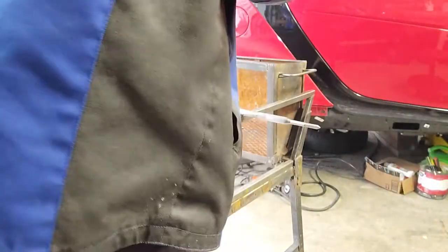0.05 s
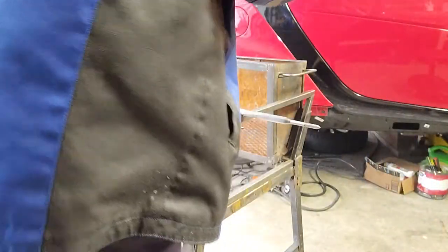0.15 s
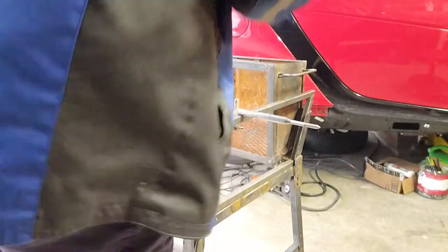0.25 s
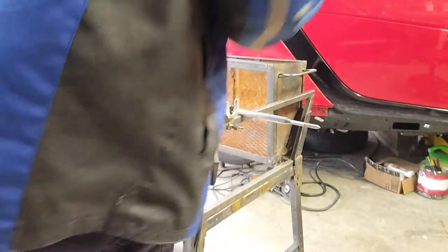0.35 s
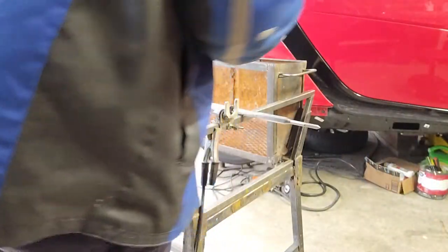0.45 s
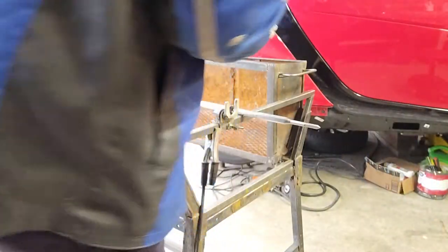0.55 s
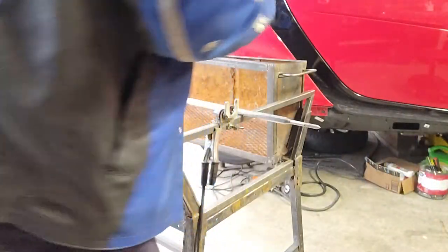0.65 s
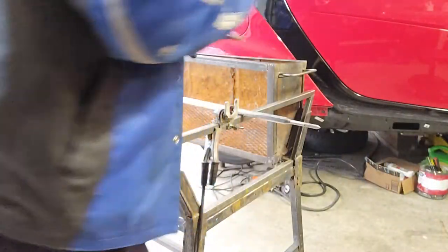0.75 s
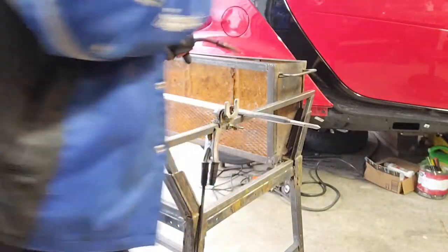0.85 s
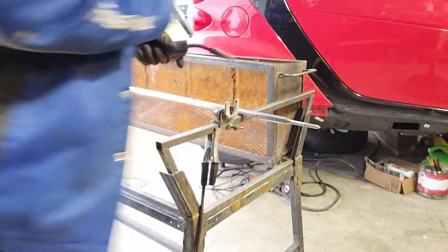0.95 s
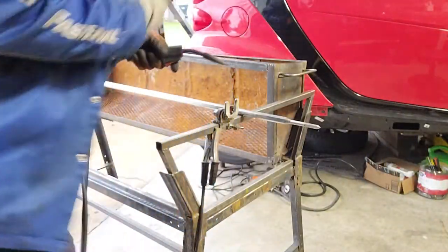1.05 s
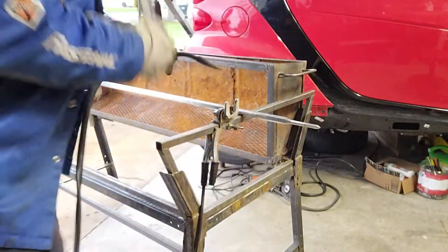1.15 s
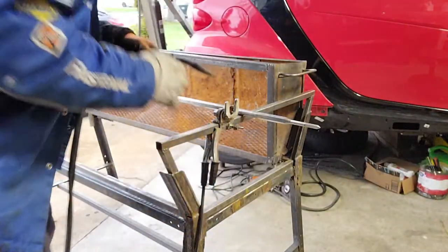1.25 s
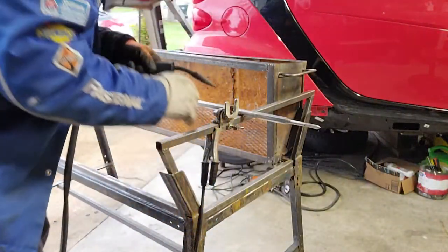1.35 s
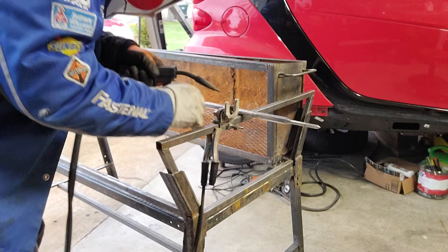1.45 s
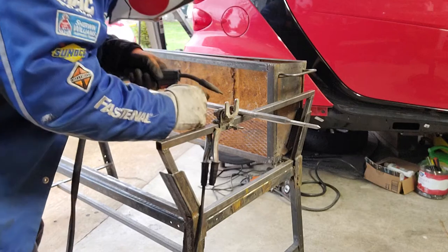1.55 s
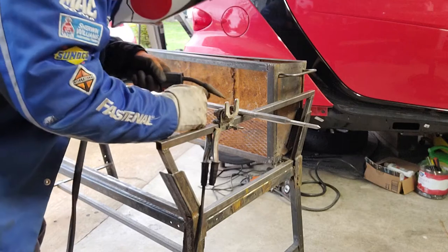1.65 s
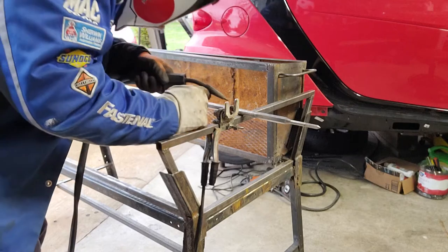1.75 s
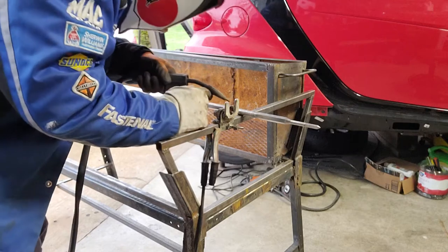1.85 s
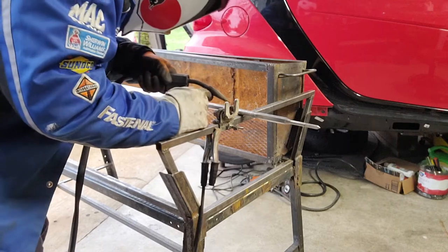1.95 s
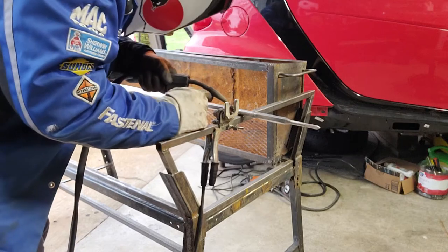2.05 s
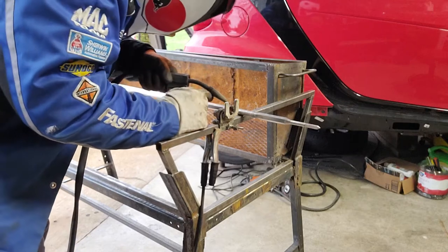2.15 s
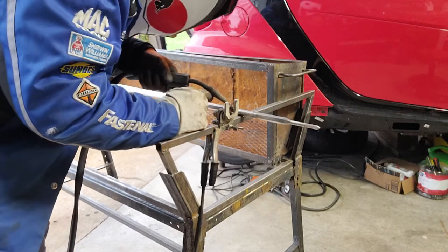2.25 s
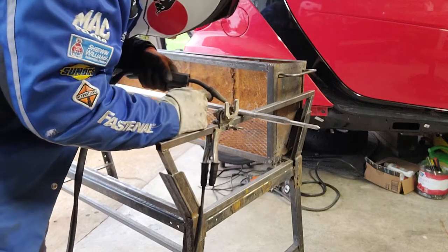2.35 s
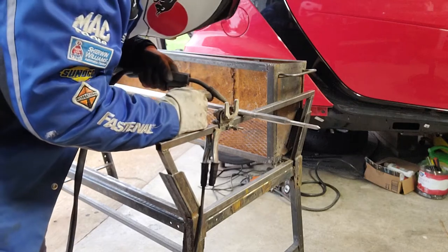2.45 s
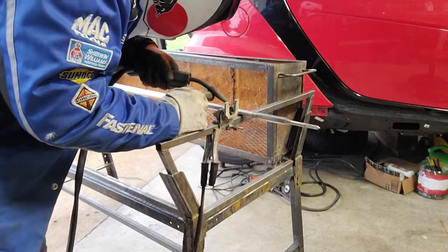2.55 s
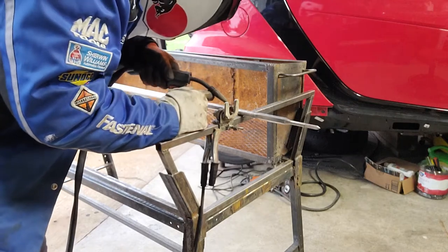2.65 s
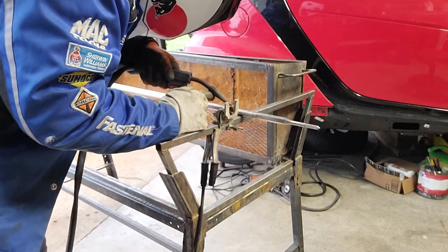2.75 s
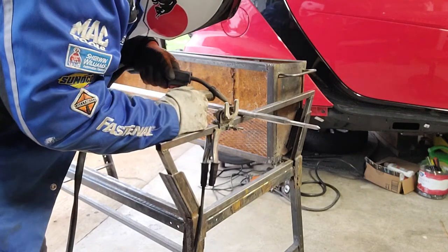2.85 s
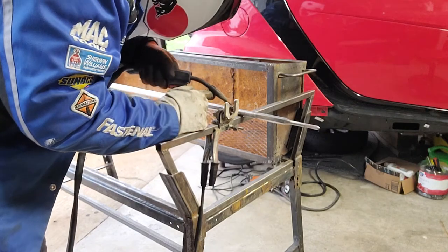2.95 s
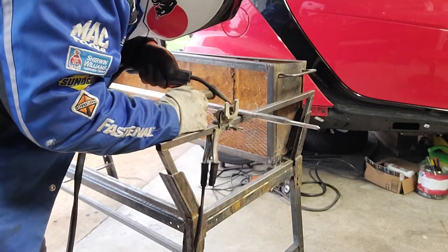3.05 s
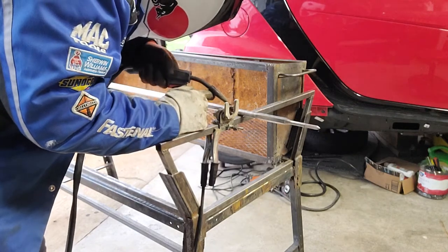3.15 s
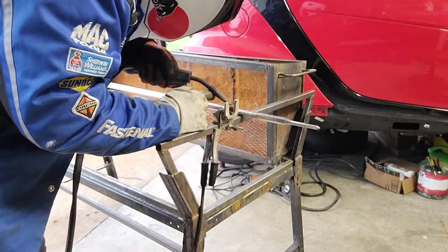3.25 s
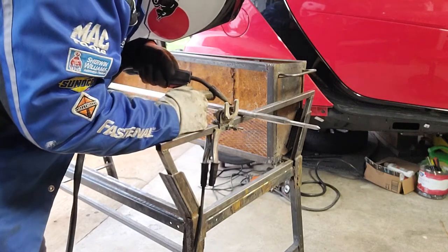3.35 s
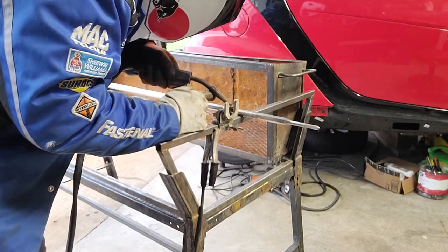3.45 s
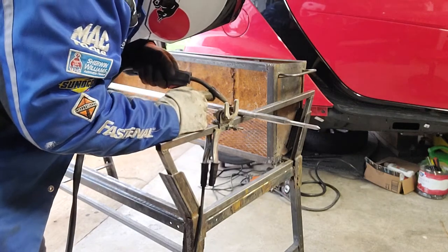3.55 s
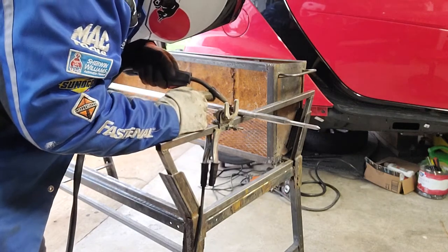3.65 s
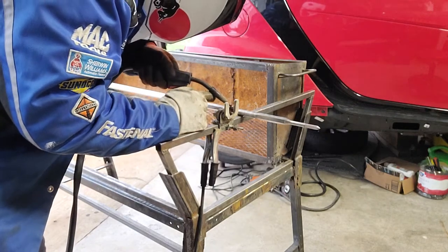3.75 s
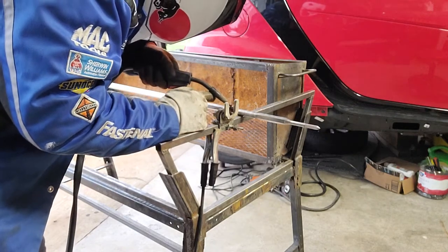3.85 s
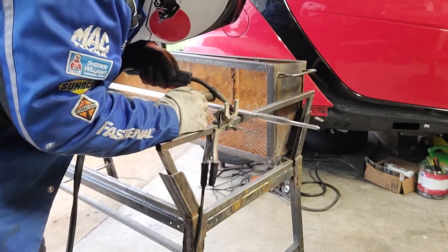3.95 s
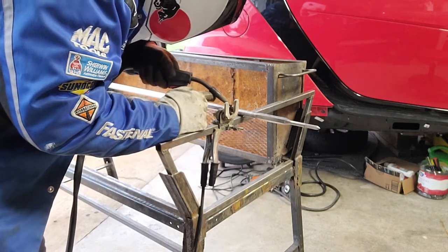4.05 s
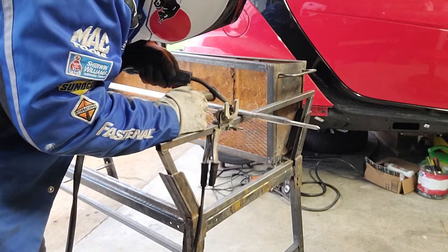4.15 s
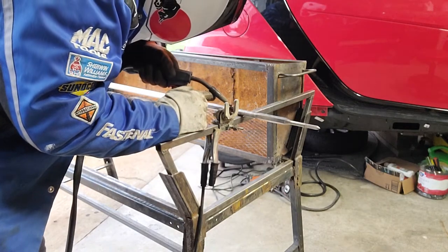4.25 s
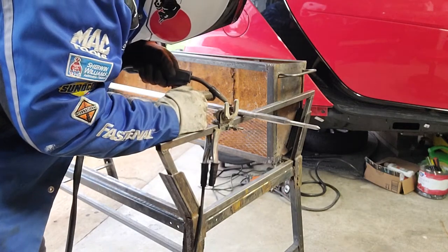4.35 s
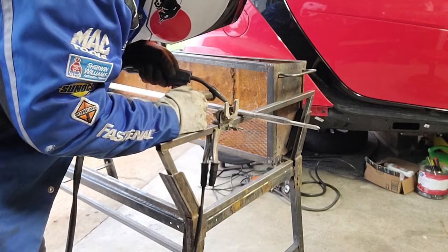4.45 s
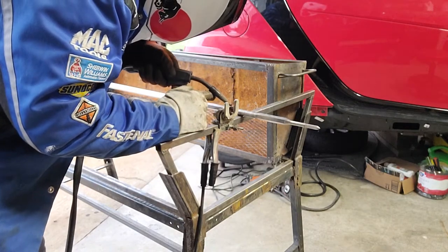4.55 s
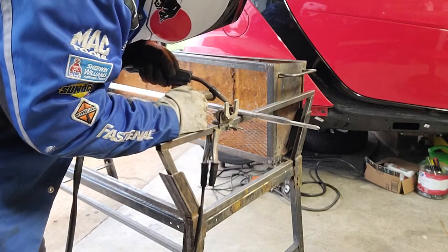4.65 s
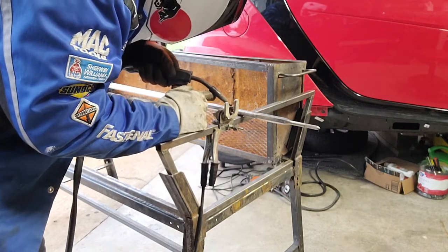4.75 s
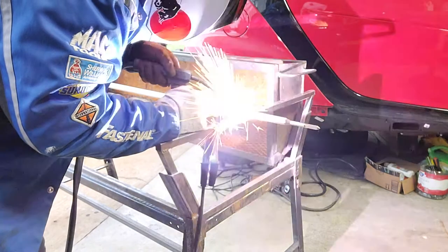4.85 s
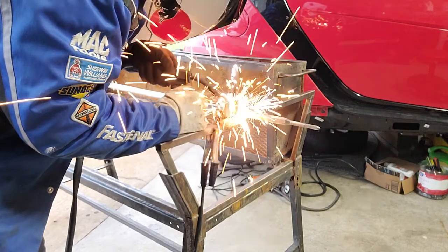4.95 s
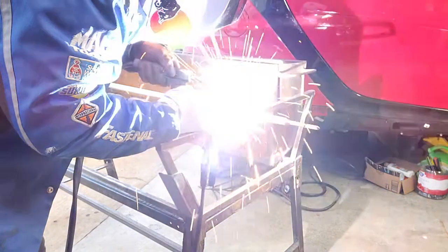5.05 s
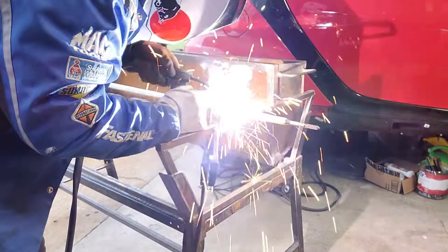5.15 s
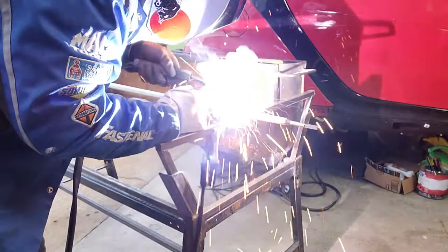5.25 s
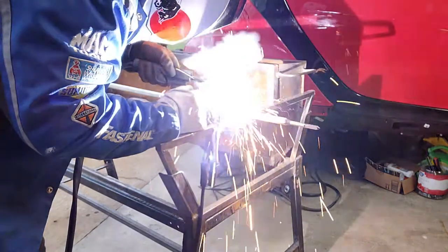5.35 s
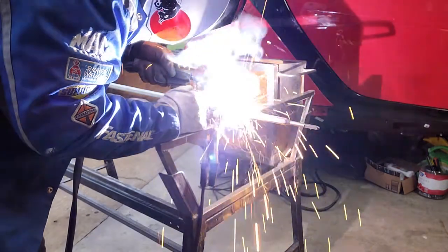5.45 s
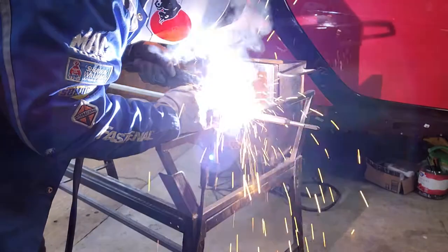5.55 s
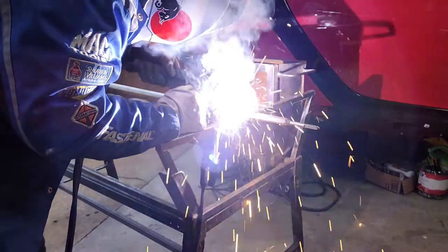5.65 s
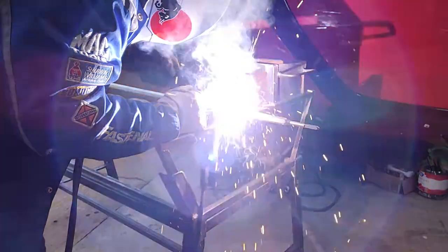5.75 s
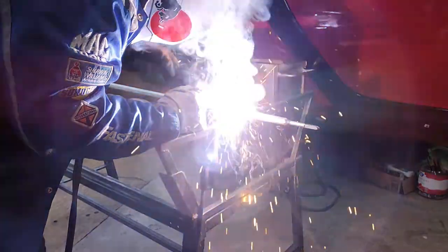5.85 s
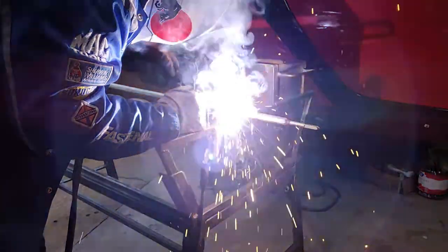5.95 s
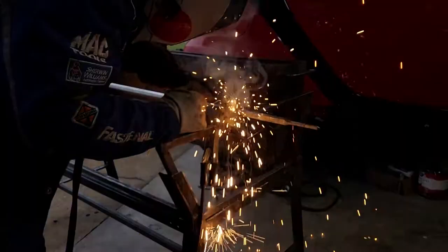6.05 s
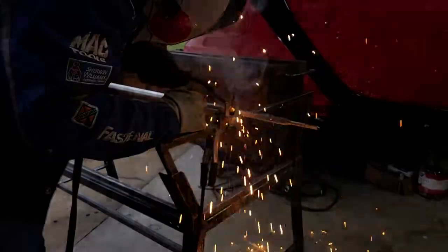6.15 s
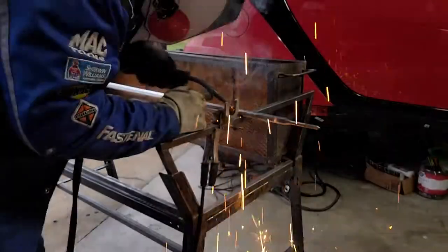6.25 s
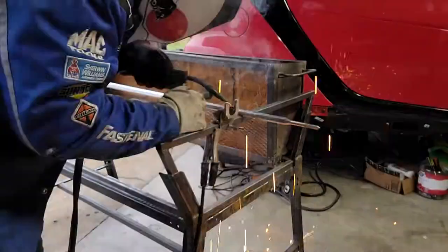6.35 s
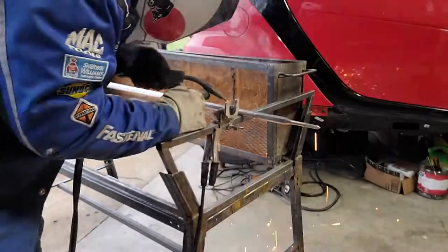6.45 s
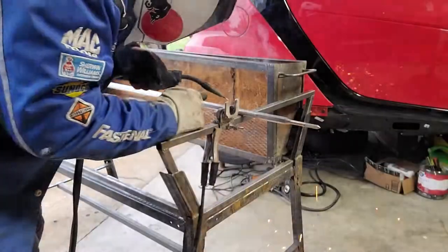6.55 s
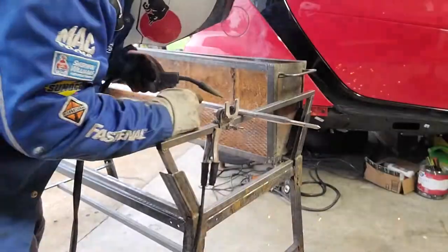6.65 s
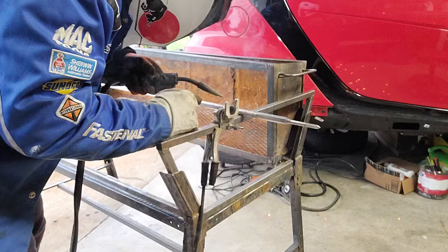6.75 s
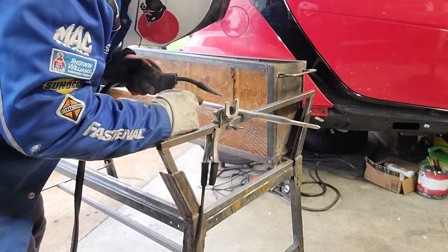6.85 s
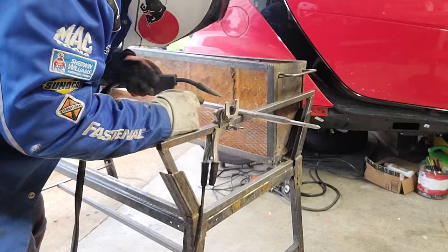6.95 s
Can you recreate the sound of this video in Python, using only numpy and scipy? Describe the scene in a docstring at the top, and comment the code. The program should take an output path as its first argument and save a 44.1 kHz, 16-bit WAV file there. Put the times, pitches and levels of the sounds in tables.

```python
"""A welding arc strikes, stutters and crackles for about a second, then dies in the room: gated noise spits and thuds.
Before and after it, damped modes ring for knocks and torch bumps; coloured grains make scuffs, squeaks and rustles.
A thin gas hiss is filtered noise. A cooling fan to the right gives shaft and blade tones over rushing air, and deep
noise rumbles and swells with each thump. The phone's two microphones turn down under the arc and recover slowly."""
import sys
import numpy as np
from scipy import signal
from scipy.fft import rfft, irfft, next_fast_len
from scipy.io import wavfile
from scipy.ndimage import uniform_filter1d

SR = 44100
rng = np.random.default_rng(int(sys.argv[2]) if len(sys.argv) > 2 else 0)


def transcribe(u):
    """Save the signal u as a 16-bit wav file named by the first command-line argument.

    u: samples, shape (n,) or (channels, n), limited to [-1, 1]; the rate is SR.
    q: integer samples, one column per channel.
    """
    v = np.clip(np.atleast_2d(u).T, -1, 1)
    q = np.round(v * 32767).astype(np.int16)
    wavfile.write(sys.argv[1], SR, q)


def invert_db(level):
    """Linear amplitude ratio for a level in decibels (20 dB per decade), elementwise."""
    return 10 ** (np.asarray(level, dtype=float) / 20)


N = 308259

# colour of the floor rumble: (frequency [Hz], response [dB])
RUMBLE_COLOUR = [(15, -50), (28, -16), (42, -3.0), (70, 1.0), (130, -4.0), (250, -16.5), (600, -46.5)]
# heavy steps and thumps through the floor: (time [s], level [dB], decay by 60 dB [s])
FLOOR_THUMPS = [(0, -33.5, 0.17), (0.2, -37.5, 0.62), (1.15, -53, .6), (4.3, -47, 0.41), (4.68, -44, 1),
                (4.8, -49, 0.94), (5.06, -33.5, 0.31), (6.925, -35, 0.86)]

# fan shaft speed, a shade faster by the end of the weld: (time [s], turns per second [Hz])
SHAFT_SPEED = [(0, 74.08), (4.7, 74.08), (6.1, 74.22)]
# multiples of the shaft turn that sound, for seven blades: [times the shaft speed]
TONE_MULTIPLES = [1, 2, 3, 4, 7, 8, 10, 14, 16, 19, 20, 21, 24, 28, 35, 42, 44, 49, 56, 63]
# one row for each multiple: (level [dB], left minus right [dB], lag of the left [rad],
# change while the worker stands in front [dB])
TONE_LEVELS = [(-67, 0, -0.5, 2), (-64, 0, 0, -7), (-60, 1, 0.63, 0), (-54, -2, 0.7, -2), (-64, -6, 2.2, 6),
               (-64.5, -4, 0.9, -9), (-65.5, -7, 1.6, 2), (-50.2, -1.2, 2.68, 0.8), (-62, 1, 3.5, -1),
               (-65, -2, -3.5, 1.5), (-60.5, -3, -3, 5), (-55.5, 1, -.5, -0.5), (-54, 4.5, 0.1, 0.5),
               (-59, 4.5, 0.33, -1), (-62, 6, 3.5, 2), (-72.5, -10, -2.5, 2), (-74, -1, 0, 1.5),
               (-69, -6, -1.8, 4), (-75, -1, 2.6, -1.5), (-74, -1, 2, 0)]
# how far the worker stands in front of the phone: (time [s], share [1 = in front])
WORKER_IN_FRONT = [(0, 0.65), (.65, 1.3), (.95, 0.02)]
# colour of the fan air: (frequency [Hz], response [dB])
AIR_COLOUR = [(53, -48), (90, -23), (180, -20), (303, -1.5), (450, -3), (535, -8.5), (600, -3), (670, -12),
              (750, -5), (820, -7), (1020, -4), (1120, -15.5), (1350, -10.5), (1790, -17.5), (1890, -20),
              (1980, -20), (2060, -21), (2400, -21), (2950, -24), (3590, -22), (9110, -34), (11100, -32.5),
              (16000, -33)]
# air noise that both microphones share: (frequency [Hz], share of the power [0-1])
AIR_SHARED = [(100, 0.92), (350, 0.98), (780, 0.59), (1500, 1), (2600, 0.39), (5000, 0.23), (12000, .05)]
# stereo tilt of the fan air: (frequency [Hz], left minus right [dB])
AIR_TILT = [(100, -1.5), (700, -2), (2400, -5), (6000, 4.5), (9000, -4), (11500, -13.5), (15000, -7)]

# shielding gas: (time [s], level [dB])
GAS_LEVEL = [(4.66, -87), (4.7, -76), (6.1, -58), (6.65, -62.5), (7, -60)]
# colour of the nozzle hiss: (frequency [Hz], response [dB])
GAS_COLOUR = [(2000, -28.5), (6000, -8), (9500, -19), (11500, -6), (16000, -3)]

# a shoe scuffs the floor: (start [s], loudest [s], end [s], level [dB])
SHOE_SCUFFS = [(1.107, 1.155, 1.215, -34.5)]
# colour of sole on floor: (frequency [Hz], response [dB])
SOLE_COLOUR = [(300, -30), (700, -13), (1200, -8), (2000, -11.5), (3080, -7.5), (4000, -14), (5100, -10.5),
               (6200, -17.5), (7690, -16.5), (8790, -25.5), (16000, -15.5)]
# the rubber squeaks during the scuff: (start [s], loudest [s], end [s], level [dB])
RUBBER_SQUEAKS = [(1.122, 1.138, 1.165, -33.5)]
# colour of the rubber: (frequency [Hz], response [dB])
RUBBER_COLOUR = [(900, -35), (1400, -8), (1556, -1.5), (1680, -13), (1880, -1), (2010, -1), (2180, 0),
                 (2350, -18), (2640, -11), (4000, -34)]
# the torch drags on the steel: (start [s], loudest [s], end [s], level [dB])
TORCH_DRAGS = [(.826, .855, 0.907, -39.5), (1.017, 1.022, 1.04, -42)]
# colour of the steel: (frequency [Hz], response [dB])
STEEL_COLOUR = [(180, -37), (400, -3), (645, -4), (1170, -7.5), (1480, -13), (2900, -11), (3800, -22),
                (8220, -33), (16000, -40)]
# cloth rustles: (start [s], loudest [s], end [s], level [dB]); the last row's end lies before its start, so it
# makes no rustle but a faint steady cloth bed that drops at 6.28 s
CLOTH_RUSTLES = [(.12, .2, 0.32, -58.5), (.825, .83, 0.94, -54), (.955, .97, 1.2, -53.5),
                 (6.657, 6.665, 6.28, -45)]
# colour of the cloth: (frequency [Hz], response [dB])
CLOTH_COLOUR = [(1000, -24), (4000, -2.5), (8500, -18.5), (11000, -5), (16000, -8.5)]
# the wire touches down and scrapes: (start [s], loudest [s], end [s], level [dB])
WIRE_TOUCH = [(4.8, 4.835, 4.86, -43)]
# colour of the wire: (frequency [Hz], response [dB])
WIRE_COLOUR = [(500, -37), (1300, 1), (2000, -2), (3000, -12), (5000, -24.5)]

# knocks of trigger, cable and feet: (time [s], relative level [dB], pitch [Hz],
# decay by 60 dB at the pitch [s], tick level [dB])
KNOCK_EVENTS = [(0.212, -30, 199, 0.096, -60), (.23, -28, 227, 0.045, -72), (0.31, -32, 89, 0.04, -72),
                (0.384, -40, 81.6, 0.062, -70), (.745, -39, 150, 0.08, -70), (1.1071, -32, 560, 0.024, -42),
                (2.049, -39, 245, 0.068, -70), (4.673, -36, 140, 0.15, -58), (4.798, -41, 320, 0.2, -51),
                (5.424, -42, 62, 0.14, -70), (5.885, -41, 65, .15, -72), (5.996, -37, 78.6, 0.21, -70),
                (6.657, -61, 2040, .02, -43), (6.909, -36, 308, 0.11, -70), (6.926, -32.5, 61.5, 0.5, -68)]
# modes of a knock: (frequency [times the pitch], level for a 550 Hz pitch [dB])
KNOCK_RATIOS = [(1.015, 3), (0.6, -9), (1.4, -2.5), (2.8, -3.5), (3.7, -5)]

# the torch bumps and chatters on the bench: (time [s], relative level [dB],
# frequency that the contact stirs most [Hz], tick level [dB])
BUMPS = [(.827, -32, 2200, -38), (.831, -35, 700, -48), (0.837, -31, 1100, -50), (.843, -34, 500, -55),
         (.851, -20, 560, -48), (.8555, -34, 450, -52), (0.8586, -27.5, 900, -50), (0.863, -32, 1500, -48),
         (.87, -35, 900, -50), (.879, -36, 420, -60), (.886, -39, 450, -60), (1.018, -29, 1300, -44),
         (1.02, -26, 620, -60), (1.027, -33, 476, -54), (1.0355, -26.5, 420, -56)]
# ringing of the torch body: (frequency [Hz], level [dB], decay by 60 dB [s])
TORCH_RINGING = [(310, -1.5, .04), (458, 0.5, 0.031), (650, 0, 0.031), (780, 1, 0.023), (1100, -7.5, 0.023),
                 (1440, -5.5, 0.03), (2280, -4.5, .035), (2960, -7.5, .035), (3580, -11, .03)]

# each time the arc relights: (strike [s], length [s], sizzle level [dB], sag before it goes out [dB])
ARC_BURNS = [(4.852, 0.019, -19, 3), (4.881, 0.02, -24, 6), (4.903, 0.015, -15.5, 1.5),
             (4.924, 0.045, -19.5, 21), (4.97, 0.015, -29, 0), (4.99, 0.051, -43, 6),
             (5.031, 0.017, -32, -3), (5.049, 0.017, -21.5, -7), (5.072, 0.079, -20, 7.5),
             (5.135, 0.068, -19, 15), (5.201, 0.056, -22.5, 4), (5.264, 0.11, -25, 4),
             (5.365, 0.052, -25.5, 4), (5.42, 0.022, -28, 5), (5.443, 0.076, -27, -6.5),
             (5.518, 0.027, -20.5, 8), (5.55, 0.0055, -31, 5), (5.562, 0.01, -24, 9),
             (5.586, 0.03, -26.5, -6), (5.622, 0.036, -23.5, 4), (5.661, 0.021, -26, 3),
             (5.693, 0.071, -28, -8), (5.78, 0.053, -27, -3), (5.834, 0.015, -24.5, -3.5),
             (5.848, 0.08, -21, -0.5), (5.927, 0.069, -22.5, -2.5), (6.011, 0.023, -21.5, 5)]
# short circuits that burst: (time [s], relative thud level [dB], relative snap level [dB])
SHORT_BURSTS = [(4.8519, -8.5, -7.5), (4.8534, -25, 1), (4.877, -18, 2), (4.8887, -24, 0), (4.9, -22, 8),
                (4.9115, -11, -9), (4.919, -19, -1), (4.9691, -9, 3), (5.012, -24, -23), (5.019, -22, -24),
                (5.0294, -11, -4), (5.0468, -28, 5), (5.0506, -29, 3.5), (5.0659, -29, 5.5),
                (5.108, -21, 0), (5.1397, -8, -10), (5.1617, -8.5, -6), (5.165, -21, -5), (5.2013, -11, 0),
                (5.209, -21, -0.5), (5.223, -28, 1), (5.228, -28, 4.5), (5.24, -30, 2.5), (5.2643, -20, -1),
                (5.268, -33, 5), (5.285, -34, 1), (5.2872, -25, -2), (5.2939, -28, -1), (5.3001, -29, 6),
                (5.326, -27, 3), (5.3445, -24, 2), (5.3515, -15, 2), (5.3632, -26, -10),
                (5.3687, -5.5, 6.5), (5.373, -22, 3), (5.3749, -9.5, -2), (5.3885, -20, 6),
                (5.395, -31, -8), (5.4004, -22, 1), (5.42, -27, 5), (5.4244, -14, 3), (5.444, -33, 5.5),
                (5.4524, -30, 7), (5.469, -32, 7), (5.484, -19, 4), (5.495, -25, 4.5), (5.5108, -32, 4.5),
                (5.554, -33, 3), (5.5623, -28, 6), (5.587, -33, 5.5), (5.6095, -30, 3.5), (5.6228, -29, 5),
                (5.6493, -27, 8), (5.6606, -29, -5), (5.68, -31, -3), (5.6916, -33, 8), (5.7026, -30, 1),
                (5.712, -25, 8.5), (5.729, -22, 7.5), (5.7588, -24, 7), (5.772, -22, -2),
                (5.7802, -14, 1.5), (5.795, -16, 0), (5.8107, -28, -4), (5.8182, -21, -1.5),
                (5.8351, -10, 2), (5.8495, -13, 3), (5.8686, -22, -1), (5.8818, -31, 0), (5.8872, -24, 5),
                (5.9027, -19, 3), (5.9287, -22, 1), (5.9525, -22, -1), (5.957, -23, -10), (5.9662, -24, 0),
                (5.995, -18, -1.5), (6.0027, -18, 2), (6.011, -15, -1), (6.0154, -20, 6), (6.028, -23, 3)]
# colour of the early sizzle: (frequency [Hz], response [dB])
EARLY_SIZZLE = [(2000, -32), (3200, -14.5), (5000, -9.5), (6300, -9.5), (7400, -2), (9000, -11.5),
                (11000, -1.5), (13500, -2), (14800, 2.5), (15500, 1), (17000, 1)]
# thinner, higher sizzle once the weld pool has formed: (frequency [Hz], response [dB])
SETTLED_SIZZLE = [(2000, -28.5), (3200, -10), (5000, -10), (6300, -5.5), (7400, -2.5), (9000, -12),
                  (11000, -4), (13500, -3), (14800, 2), (15550, 6.5), (17000, 3.5)]
# crossfade between the two: (time [s], share of the settled colour [0-1])
SETTLING_SHARE = [(5.1, 0.035), (5.6, 0.89)]
# colour of the right microphone's view of the sizzle: (frequency [Hz], response [dB])
RIGHT_VIEW = [(2000, -2), (4000, -3.5), (5500, -4), (7300, -4.5), (8800, 1), (11000, 1.5), (15500, 0.1)]
# colour of the arc's lower body: (frequency [Hz], response [dB])
ARC_BODY = [(60, -23), (150, -7.5), (230, -2.5), (290, 0.5), (419, -7), (560, -7.5), (660, -5), (742, -8.5),
            (1220, -7.5), (1370, -12), (1500, -5.5), (5000, -10.5), (6500, -13), (11000, -120)]
# borders of the bands that surge separately: [Hz]
SURGE_BORDERS = [0, 700, 1500, 3000, 5000, 8000, 11000, 14000, 22050]


def curve(rows, col):
    """A table column joined by straight lines in time."""
    rows = np.array(rows)
    return np.interp(np.arange(N) / SR, rows[:, 0], rows[:, col])


def along_hz(rows, size):
    """A (frequency [Hz], value) table read at every bin of a spectrum, straight on a log axis."""
    rows = np.array(rows, float)
    hz = np.arange(size // 2 + 1) * SR / size
    return np.interp(np.log(hz + 1), np.log(rows[:, 0] + 1), rows[:, 1])


def colour(x, rows_db):
    """Causal filter of this colour, from the folded cepstrum; white noise keeps its power."""
    size = 4096
    cepstrum = irfft(np.log(invert_db(along_hz(rows_db, size))))
    cepstrum[1:size // 2] *= 2
    cepstrum[size // 2 + 1:] = 0
    taps = irfft(np.exp(rfft(cepstrum)))
    return signal.fftconvolve(x, taps / np.sqrt(np.sum(taps ** 2)))[:N]


def walk(rate):
    """Random levels held 1 / rate s and slewed twice; spread near 1."""
    hold = max(int(SR / rate), 1)
    steps = np.repeat(rng.standard_normal(N // hold + 1), hold)
    return 1.336 * uniform_filter1d(uniform_filter1d(steps, hold), hold)[:N]


def crackle(per_s, spread_db):
    """Random clicks, many small and a few large; rms 1."""
    when, size, sign = rng.random((3, N))
    sizes = invert_db(-spread_db * np.log(size + 0.012))
    clicks = (when < per_s / SR) * sizes * np.sign(sign - 0.5)
    return clicks / np.sqrt(np.mean(clicks ** 2))


def heard(x, pan_db, room_db, lag=0):
    """Direct sound at both microphones, then a tail that loses its treble first; long waves reach both alike."""
    t60_s, bright_t60_s = 0.26, 0.22
    t = np.arange(int(0.4 * SR)) / SR
    deep = uniform_filter1d(rng.standard_normal(len(t)), size=70)
    out = []
    for side in (1, -1):  # left, right
        noise = rng.standard_normal(len(t))
        noise += deep - uniform_filter1d(noise, size=70)
        dull = uniform_filter1d(noise, size=5)
        tail = dull * invert_db(-60 * t / t60_s) + (noise - dull) * invert_db(-60 * t / bright_t60_s)
        tail *= np.clip((t - 0.0015) / 0.003, 0, 1)
        # bench and body scatter it almost at once
        tail += 1.3 * noise * np.exp(-t / 0.007) * (t > 0.0006)
        wet = signal.fftconvolve(x, tail / np.sqrt(np.sum(tail ** 2)))[:N]
        direct = np.roll(x, lag * (side < 0))
        out.append(invert_db(side * pan_db / 2) * direct + invert_db(room_db) * wet)
    return np.array(out)


def rumble():
    """Deep noise that sways and swells at each thump, nearly the same at both microphones."""
    t = np.arange(N) / SR
    mid, side = (colour(rng.standard_normal(N), RUMBLE_COLOUR) for _ in range(2))
    level = invert_db(-54.5 + walk(9))
    for start, thump_db, t60 in FLOOR_THUMPS:
        rise = np.clip((t - start) / 0.018, 0, 1)
        level += rise * invert_db(thump_db - 60 * np.clip(t - start, 0, None) / t60)
    stereo = mid + 0.27 * side * np.array([[1], [-1]])
    return level * stereo * invert_db(np.array([[-1.0], [1.0]]))


def fan_air():
    """Rushing air as shaped noise, partly shared; the shared part reaches the right microphone first."""
    left_late_s = 0.00049
    size = next_fast_len(N)
    hz = np.arange(size // 2 + 1) * SR / size
    direct, left, right = (rfft(rng.standard_normal(size)) for _ in range(3))
    share = np.clip(along_hz(AIR_SHARED, size), 0, 1)
    shape = invert_db(along_hz(AIR_COLOUR, size))
    pan = invert_db(along_hz(AIR_TILT, size) / 2)
    late = np.exp(-2j * np.pi * hz * left_late_s)
    left_air = shape * pan * (np.sqrt(share) * direct * late + np.sqrt(1 - share) * left)
    right_air = shape / pan * (np.sqrt(share) * direct + np.sqrt(1 - share) * right)
    air = np.array([irfft(left_air, size)[:N], irfft(right_air, size)[:N]])
    return air * invert_db(-43.5 + 0.54 * walk(1.67)) / np.sqrt(np.mean(air ** 2))


def fan_tones():
    """Shaft and blade multiples that waver; a worker in front shades each tone and shifts its lag."""
    out = np.zeros((2, N))
    in_front = curve(WORKER_IN_FRONT, 1)
    speed = curve(SHAFT_SPEED, 1) * (1 + 0.000546 * walk(2.015))
    turn = 2 * np.pi * np.cumsum(speed) / SR
    for multiple, (tone_db, pan_db, lag, standing_db) in zip(TONE_MULTIPLES, TONE_LEVELS):
        phase = multiple * turn + 2 * np.pi * rng.random() + 0.26 * walk(8.9)
        waver_db = (-0.15 + 3 / np.sqrt(multiple)) * walk(7.7)  # low tones waver more
        sway = np.sqrt(2) * invert_db(tone_db + standing_db * in_front + waver_db)
        left_lag = lag - 0.65 * in_front  # radians
        left = invert_db(pan_db / 2) * np.sin(phase - left_lag)
        right = invert_db(-pan_db / 2) * np.sin(phase)
        out += sway * np.array([left, right])
    return out


def fan():
    """Tones of the turning shaft and blades over the air they push."""
    return fan_air() + fan_tones()


def gas():
    """A thin hiss of filtered noise from the nozzle once the trigger opens the valve."""
    return invert_db(curve(GAS_LEVEL, 1)) * colour(rng.standard_normal(N), GAS_COLOUR)


def rubs():
    """Things sliding: dense grains that catch, swell and fade, each surface with its own colour."""
    out, t = np.zeros(N), np.arange(N) / SR
    grains = 0.71 * crackle(2500, 1.5) + 0.55 * rng.standard_normal(N)
    surfaces = ((SHOE_SCUFFS, SOLE_COLOUR), (RUBBER_SQUEAKS, RUBBER_COLOUR), (TORCH_DRAGS, STEEL_COLOUR),
                (CLOTH_RUSTLES, CLOTH_COLOUR), (WIRE_TOUCH, WIRE_COLOUR))
    for rows, surface in surfaces:
        swell = np.zeros(N)
        for start, top, end, rub_db in rows:
            shape = np.interp(t, [start, start + 0.0018, top, end], [0.045, 0.67, 0.87, 0.014])
            swell += invert_db(rub_db) * shape ** 1.29
        out += colour(swell * grains, surface)
    return out


def knocks():
    """Each blow rings a few quickly damped modes with a tick of noise; deep blows barely stir the upper modes."""
    out, t = np.zeros(N + SR), np.arange(SR // 4) / SR
    for start, knock_db, pitch_hz, t60, tick_db in KNOCK_EVENTS:
        ring = np.zeros(len(t))
        for ratio, db in KNOCK_RATIOS:
            mode_db = db * np.sqrt(550 / pitch_hz) - 60 * t * ratio ** 0.5 / t60  # high modes die sooner
            ring += invert_db(mode_db) * np.sin(2 * np.pi * ratio * pitch_hz * t)
        tick = invert_db(tick_db - 60 * t / 0.014) * uniform_filter1d(rng.standard_normal(len(t)), size=2)
        first = int(start * SR)
        out[first:first + len(t)] += invert_db(knock_db - 4.5) * ring + tick
    return out[:N]


def torch():
    """Every bump rings the same body modes, most those near the pitch of the contact, with a tick of noise."""
    contact_octaves = 0.92  # modes this far from the contact's pitch are 3.8 dB weaker
    out, t = np.zeros(N), np.arange(SR // 8) / SR
    for start, bump_db, contact_hz, tick_db in BUMPS:
        ring = np.zeros(len(t))
        for hz, db, t60 in TORCH_RINGING:
            weaker_db = 3.8 * (np.log2(hz / contact_hz) / contact_octaves) ** 2
            ring += invert_db(db - weaker_db - 60 * t / t60) * np.sin(2 * np.pi * hz * t)
        tick = invert_db(tick_db - 60 * t / 0.019) * uniform_filter1d(rng.standard_normal(len(t)), size=2)
        first = int(start * SR)
        out[first:first + len(t)] += tick - invert_db(bump_db - 7.0) * ring
    return out


def burning():
    """Level of the arc: each burn lights at once, a little hot, drifts by its sag, then dies."""
    hot_db, hot_s, dies_s = 1, 0.0033, 0.0015  # both times are time constants
    t, power = np.arange(N) / SR, np.zeros(N)
    for strike, length, burn_db, sag_db in ARC_BURNS:
        age = np.clip(t - strike, 0, length)
        level_db = burn_db + hot_db * np.exp(-age / hot_s) - sag_db * age / length
        dying = np.exp(-np.clip(t - strike - length, 0, 1) / dies_s)
        power = np.maximum(power, (t > strike) * invert_db(level_db) * dying)
    return power


def surging(x):
    """The plasma never holds its shape: every band swells and thins on its own."""
    size = next_fast_len(N)
    bins, hz = rfft(x, size), np.arange(size // 2 + 1) * SR / size
    out = np.zeros(N)
    for low, high in zip(SURGE_BORDERS, SURGE_BORDERS[1:]):
        band = irfft(bins * (hz >= low) * (hz < high), size)[:N]
        out += invert_db(1.3 * walk(70)) * band
    return out


def arc():
    """Metal drops short the arc hundreds of times a second: each gap spits a bright burst of noise and thuds."""
    short_s, short_db = 0.0053, -1.5  # the shorted arc is hushed this long before each burst
    mean_burn_db, body_db, body_follows = -27, -8, 0.56  # share of the sizzle's dB changes that the body follows
    recoil_s = 0.0003  # a burst pushes the air out, then draws it back this much later
    lag = 2  # samples by which the left microphone hears it first
    power = burning()
    for start, _, _ in SHORT_BURSTS:
        power[int((start - short_s) * SR):int(start * SR)] *= invert_db(short_db)
    body = invert_db(mean_burn_db + body_db + 0.58 * walk(50))
    body *= (power / invert_db(mean_burn_db)) ** body_follows * (power > invert_db(-60))

    shorts = crackle(900, 1.6)
    pops = crackle(20, 2.3)  # smaller bursts at random
    fade = np.exp(-1 / (0.00029 * SR))
    spits = signal.lfilter([1], [1, -fade], np.abs(shorts))
    hiss = (0.3 * spits + 0.71 * invert_db(1.2 * walk(66))) * rng.standard_normal(N)
    snaps = surging(power * (hiss + 0.078 * pops))
    thuds = surging(body * (0.74 * shorts + 0.84 * rng.standard_normal(N) + 0.28 * pops))
    for start, thud_db, snap_db in SHORT_BURSTS:
        snaps[int(start * SR)] += 2.43 * invert_db(snap_db)
        thuds[int(start * SR)] += 2.0 * invert_db(thud_db) + 0.067 * invert_db(snap_db)
        thuds[int((start + recoil_s) * SR)] -= 0.42 * invert_db(thud_db)

    settled = np.clip(curve(SETTLING_SHARE, 1), 0, 1)
    bright = (1 - settled) * colour(snaps, EARLY_SIZZLE) + settled * colour(snaps, SETTLED_SIZZLE)
    left, right = heard(bright, pan_db=3, room_db=1.3, lag=lag)
    # the right microphone faces away from the arc
    sizzle = np.array([left, invert_db(-2.4) * colour(right, RIGHT_VIEW)])
    return sizzle + heard(colour(thuds, ARC_BODY), pan_db=3.0, room_db=0.54, lag=lag)


def scene():
    """Fan to the right, handling ahead or to the left, arc a little to the left."""
    background = rumble() + fan()
    handling = heard(rubs() + gas(), pan_db=10.0, room_db=3.5)
    handling += heard(knocks(), pan_db=3.5, room_db=-1.0)
    handling += heard(torch(), pan_db=0.5, room_db=-2.5)
    return background + handling + arc()


def band_limit(x):
    """A steep low-pass at the top of the band."""
    return signal.sosfilt(signal.butter(12, 16990, fs=SR, output="sos"), x)


def record(dry):
    """Gain follows slow loudness down within its range and climbs back at a crawl; peaks round off, top is cut."""
    threshold_db, range_db, crawl_db_per_s = -23.8, 6.1, 0.15
    ceiling, top_hz = 0.85, 15590
    slow = 1 / (0.06 * SR)
    power = signal.lfilter([slow], [1, slow - 1], np.mean(dry ** 2, axis=0))
    over_db = np.clip(10 * np.log10(power + 1e-12) - threshold_db, 0, range_db)
    crawl_db = crawl_db_per_s * np.arange(N) / SR
    held_db = np.maximum.accumulate(over_db + crawl_db) - crawl_db
    rounded = ceiling * np.tanh(dry * invert_db(-held_db) / ceiling)
    steep_cut = signal.ellip(6, 0.1, 25, top_hz, fs=SR, output="sos")
    mix = signal.sosfiltfilt(steep_cut, rounded)
    return band_limit(mix)


dry = scene()
out = record(dry)
transcribe(out)
```